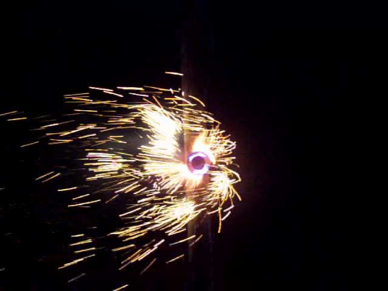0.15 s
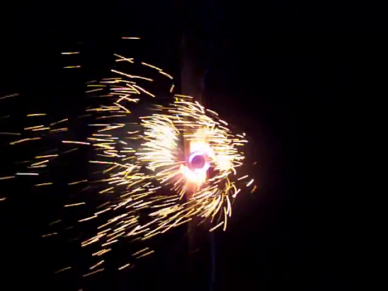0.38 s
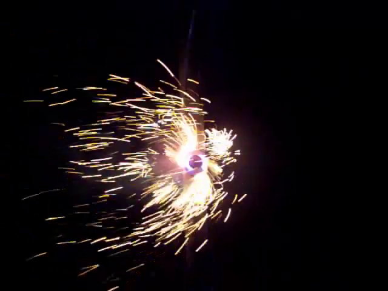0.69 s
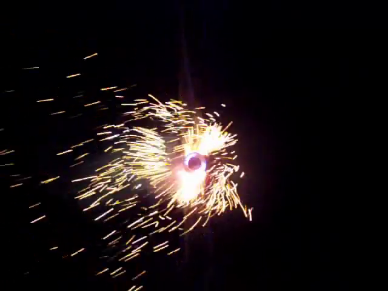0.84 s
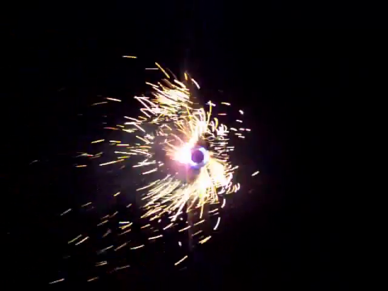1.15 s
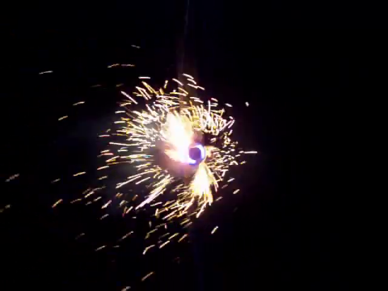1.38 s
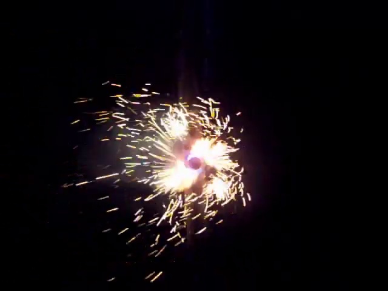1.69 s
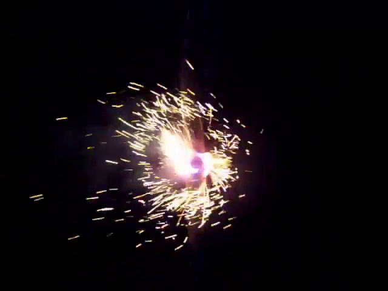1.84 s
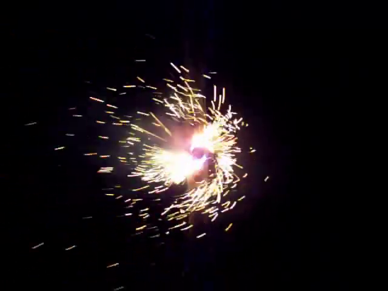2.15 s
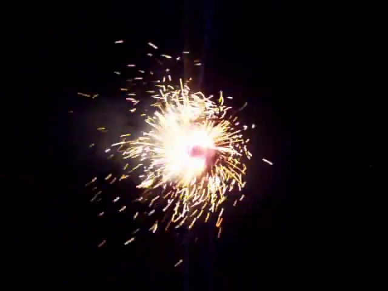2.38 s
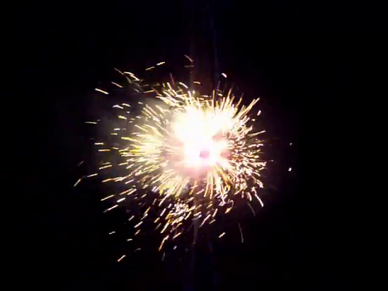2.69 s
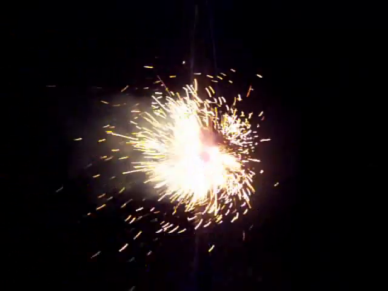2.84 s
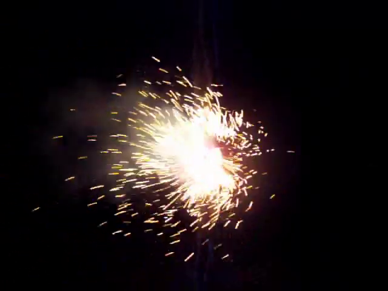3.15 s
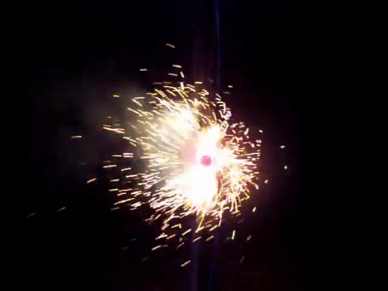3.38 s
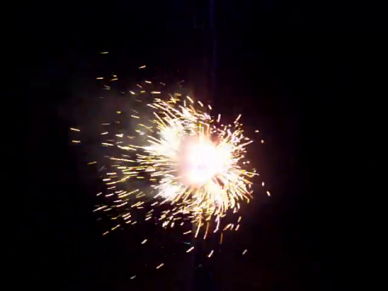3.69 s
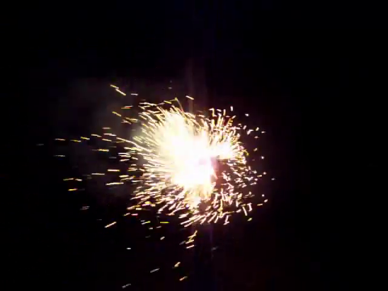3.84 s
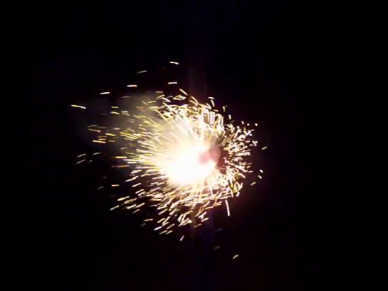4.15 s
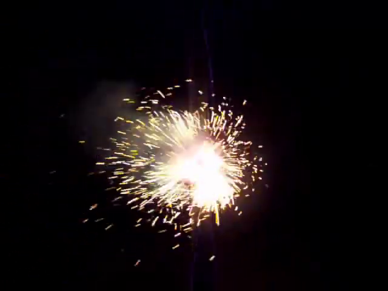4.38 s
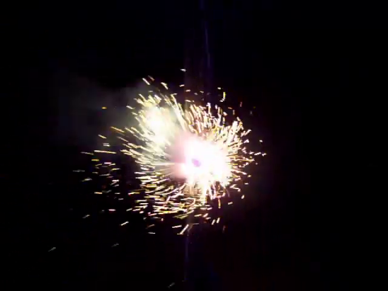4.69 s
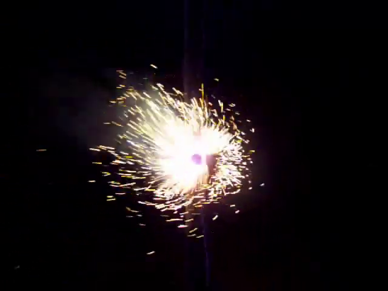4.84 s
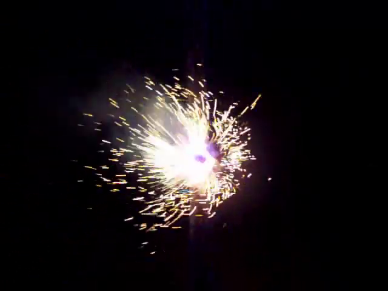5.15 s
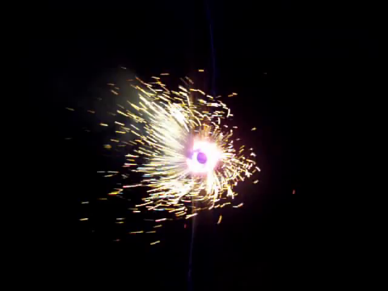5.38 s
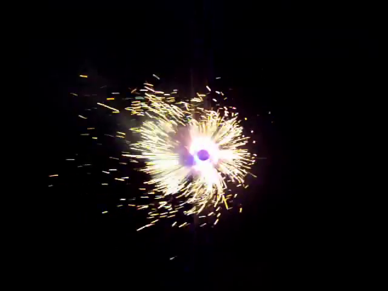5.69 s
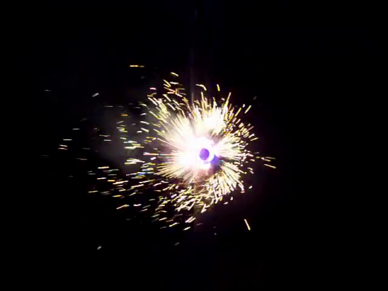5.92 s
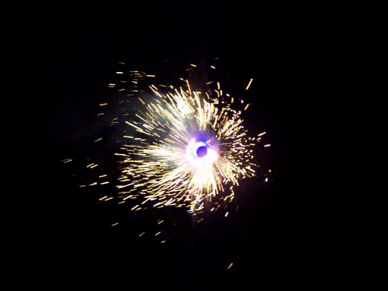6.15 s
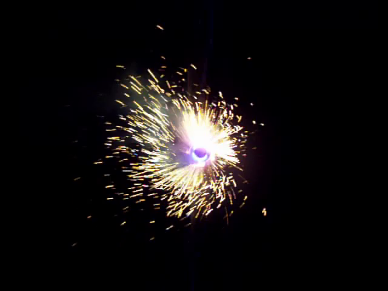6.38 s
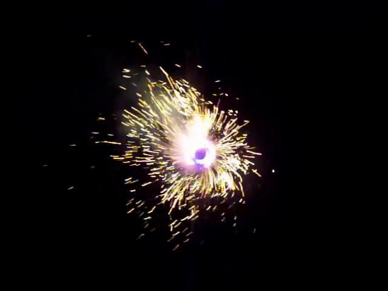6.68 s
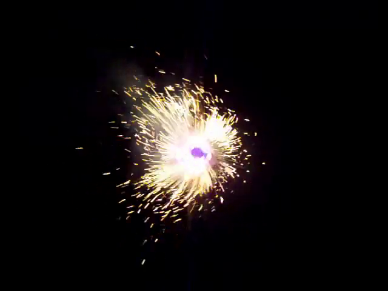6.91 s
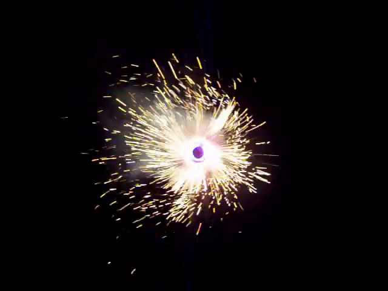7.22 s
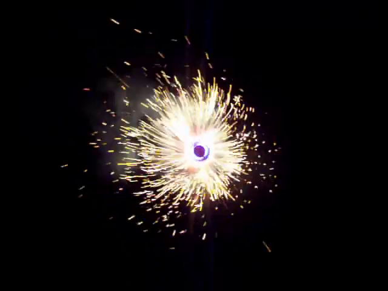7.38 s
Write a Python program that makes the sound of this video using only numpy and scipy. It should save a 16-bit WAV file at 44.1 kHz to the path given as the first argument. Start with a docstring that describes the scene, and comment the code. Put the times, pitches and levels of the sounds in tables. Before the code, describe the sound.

A spinning firework wheel hisses and roars steadily outdoors, throbbing rapidly and sputtering, with crackling sparks and a few small pops.

```python
"""Firework wheel outdoors

A firework wheel whirls on a post, some metres from a small one-port camera microphone.
Turbulence makes its two jets hiss and roar; they sputter as they burn unevenly and throb as they
swing round. Sparks crackle and a few pop. Wind pressure rumbles on the microphone port,
and the low harmonics of a far engine drone for a while and fade."""
import sys
import numpy as np
from scipy import signal
from scipy.fft import rfft, irfft
from scipy.io import wavfile
from scipy.ndimage import uniform_filter1d

SR = 44100
rng = np.random.default_rng(int(sys.argv[2]) if len(sys.argv) > 2 else 0)


def log_audio(samples):
    """Write samples as a 16-bit WAV file to the path given in sys.argv[1]."""
    # one column per channel
    frames = np.atleast_2d(samples).T
    # limit to full scale, then quantise
    limited = np.clip(frames, -1, 1)
    pcm = np.round(limited * 32767).astype(np.int16)
    wavfile.write(sys.argv[1], SR, pcm)


N = 332514

# Spectra at the microphone of the jets' hiss, sizzle and roar, the burning tube's hollow ring,
# the flame's flutter and the spark spray's thin treble: f/Hz, relative spectral density/dB
HISS_SPECTRUM = [(1200, -23.5), (1500, -15.5), (1800, -4.5), (2150, -3), (2400, 0.5), (2650, 0),
                 (2950, -3.5), (3380, -7.5), (3950, -2.5), (4400, -10), (5000, -24.5)]
SIZZLE_SPECTRUM = [(3800, -32), (4450, -8), (4700, -5), (5300, -3), (5850, -2), (6200, -5.5), (6700, -3.5),
                   (7020, -0.5), (7500, -4.5), (7850, -13.5), (8200, -36.5)]
ROAR_SPECTRUM = [(330, -25.5), (410, -16), (540, -2.5), (630, -1.5), (680, -2), (800, -0.5), (900, -0.5),
                 (975, -8), (1140, -8.5), (1300, -20), (1500, -24.5)]
RING_SPECTRUM = [(650, -23), (770, -3), (820, 1.5), (870, -6.5), (1000, -29.5)]
FLUTTER_SPECTRUM = [(76, -38.5), (130, -19.5), (167, -14.5), (290, -1.5), (410, -12), (530, -38.5),
                    (900, -120)]
SPRAY_SPECTRUM = [(7500, -15), (7900, 1), (8200, -3.5), (8450, -3), (8900, -18.5), (9150, -37)]
# Course of the burn, the roar thinning as the sizzle flares: t/s, roar/dB, hiss/dB, sizzle/dB
BURN_LEVELS = [(0, -22.5, -26.5, -26.5), (.6, -23, -29, -27.5), (1, -22, -27.5, -27), (1.3, -23, -28, -27),
               (2.15, -22.5, -27, -28), (2.4, -24, -26.5, -25.5), (2.6, -27, -26, -23),
               (2.8, -26.5, -27, -25), (3.1, -23.5, -25.5, -26), (3.6, -24.5, -25.5, -25.5),
               (4.1, -23.5, -25, -25.5), (5, -24, -26, -25.5), (5.35, -24, -27, -25.5),
               (5.7, -22.5, -25, -26.5), (6.3, -23, -26.5, -26.5), (6.9, -23, -26.5, -26.5),
               (7.3, -25.5, -26.5, -23.5), (7.54, -23.5, -26, -26.5)]
# Resonance of the tube: t/s, level relative to the roar/dB
RING_LEVEL = [(0, -7), (2.2, -5.5), (2.6, -11), (3.6, -13.5), (5.3, -9), (6.3, -14.5), (7.54, -6)]
def jets():
    """Turbulent jet noise: uneven burning modulates the bands together, and each also flickers alone."""
    hiss_throb, roar_throb, (hiss_pulse, sizzle_pulse, roar_pulse) = rotation()
    sputter, surge = walk(45), walk(17)
    hiss = gas(hiss_throb + hiss_pulse + .51 * sputter + .5 * surge + .34 * walk(30), 300, 15.6, 15)
    sizzle_flicker = .37 * surge + .61 * sputter + 1.06 * walk(80)
    sizzle = gas(.36 * hiss_throb + sizzle_pulse + sizzle_flicker, 300, 21, 16)
    roar = gas(roar_throb + roar_pulse + .4 * sputter + .93 * walk(25), 80, 22, 10.5)
    ring = gas(1.9 * roar_throb + 3.7 * roar_pulse + .75 * walk(16), 44, 24, 14)
    flutter = gas(.46 * roar_throb + .48 * surge + 1.1 * sputter + 1.35 * walk(28), 30, 27, 9.1)
    spray = gas(sizzle_pulse + .85 * sputter + .72 * surge + 2.1 * walk(70), 300, 30, 10)

    roar_db, hiss_db, sizzle_db = curves(BURN_LEVELS)
    bright_spurt, deep_spurt = spurts()
    flutter_db = -33.5 + 3 * (roar_db + 23.5)  # moves 3 dB for each dB of roar
    puffs_db = 1.46 * deep_spurt + 1.2 * walk(8)
    bands = [(hiss, HISS_SPECTRUM, hiss_db + bright_spurt),
             (sizzle, SIZZLE_SPECTRUM, sizzle_db + bright_spurt),
             (roar, ROAR_SPECTRUM, roar_db + deep_spurt),
             (ring, RING_SPECTRUM, roar_db + deep_spurt + curves(RING_LEVEL)[0]),
             (flutter, FLUTTER_SPECTRUM, flutter_db + puffs_db),
             (spray, SPRAY_SPECTRUM, sizzle_db + bright_spurt - 19.5)]
    return sum(undb(db) * unit(colour(noise, spectrum)) for noise, spectrum, db in bands)


def gas(flicker_db, sparks_per_s, max_spark_db, spark_range_db):
    """Gaussian noise of turbulence plus shot noise of sparks, modulated in amplitude together."""
    onset, polarity, size = rng.random((3, N))
    sparks = (onset < sparks_per_s / SR) * np.sign(polarity - .5)
    sparks *= undb(max_spark_db - spark_range_db * size)
    return unit(undb(flicker_db) * (rng.standard_normal(N) + sparks))


# Speed of the wheel: t/s, rotation rate/Hz
WHEEL_SPEED = [(0, 17.5), (2.46, 17.5), (2.87, 19.55), (4.6, 19.9), (5.2, 20.35), (6, 20.3), (7.54, 20.3)]
# Throb once a turn: t/s, hiss depth/dB, roar depth/dB, lead of roar over hiss/turns
TURN_THROB = [(0, 2.6, 1.7, -0.38), (.75, 2.5, 2.0, -0.26), (1.3, 2, 2.2, -.28), (1.8, 2.5, 1.3, -0.25),
              (2.4, 1.04, .5, -.42), (4.5, 1, 1, -0.55), (7, 1.06, 1.9, -0.48), (7.54, 0.4, 0.5, -0.41)]
# Pulse of the two jets, twice a turn; rows for hiss, sizzle and roar: depth/dB, lead/cycles
JET_PULSES = [(1, 0.14), (1.1, -0.3), (0.66, .15)]
def rotation():
    """Directivity: each band beams its own way from the nozzle, so peaks at its own point of the turn."""
    turns = np.cumsum(curves(WHEEL_SPEED)[0]) / SR + .45
    hiss_depth, roar_depth, roar_lead = curves(TURN_THROB)
    hiss_throb = hiss_depth * np.cos(2 * np.pi * turns)
    roar_throb = roar_depth * np.cos(2 * np.pi * (turns + roar_lead))
    pulses = [depth * np.cos(2 * np.pi * (2 * turns + lead)) for depth, lead in JET_PULSES]
    return hiss_throb, roar_throb, pulses


# Spurts (+) and falters (-) of the burn: t/s, width/s, bright bands/dB, deep bands/dB
BURN_SPURTS = [(0.116, 0.032, -5, -5), (0.34, 0.028, -1, -4), (.39, .05, 2, -0.5), (0.454, .05, -2.5, 2),
               (0.616, .04, 3.5, 2), (0.69, .06, -0.5, -3), (0.922, .08, 0.5, 1), (1.06, 0.055, -1, -5.5),
               (1.122, .06, 1.5, 4), (1.174, 0.083, -3.5, -2.5), (1.513, 0.023, 0, 3.5),
               (1.596, 0.089, 2, -2.5), (1.648, 0.045, -1.5, -1.5), (1.9, 0.029, -2, -2.5),
               (3.38, 0.027, -3.5, 0), (3.425, .05, 1.5, 1.5), (4.36, 0.05, -3.5, -1.5),
               (6.22, 0.14, -0.5, 1), (6.353, 0.027, -2, -3), (6.403, .04, 0.5, 3.5),
               (6.449, 0.023, -5.5, -1.5), (6.502, 0.023, -5.5, -4), (6.655, .04, -2.5, -1.5),
               (7.197, 0.035, 0, -4), (7.43, 0.071, 0, -3)]
def spurts():
    """Unsteady combustion: each spurt or falter is a Gaussian rise or dip in level."""
    t = np.arange(N) / SR
    return sum(np.exp(-(2 * (t - centre) / width) ** 2) * np.array([[bright_db], [deep_db]])
               for centre, width, bright_db, deep_db in BURN_SPURTS)


# Loud sparks: t/s, level/dB, share of the roar's spectrum (0-1)
LOUD_SPARKS = [(0.141, -24, 0.4), (0.396, -9, 0.76), (0.597, -5.5, 0.45), (0.877, -9, 0.4),
               (1.355, -14, 0.8), (1.468, -11, 0.3), (1.992, -7, 0.56), (2.097, -9, 0.76),
               (2.297, -11, 0.7), (4.333, -7.5, 0.6), (4.514, -13, 0.4), (6.518, -10, 1), (6.687, -8, 0.95),
               (6.919, -11, 0.9)]
def pops(delay_s=.0012):
    """Impulse excitation: a bursting spark is a short pressure pulse with the spectra of the jets."""
    out = np.zeros(N)
    crack, thud = response(HISS_SPECTRUM)[:1024], response(ROAR_SPECTRUM)[:1024]
    crack, thud = crack / np.abs(crack).max(), thud / np.abs(thud).max()
    for t, db, share in LOUD_SPARKS:
        start = int((t + delay_s) * SR)
        pulse = ((1 - share) * crack + share * thud)[:N - start]
        out[start:start + len(pulse)] += undb(db) * pulse
    return out


# Wind pressure at the port: f/Hz, relative spectral density/dB
WIND_SPECTRUM = [(12, -35.5), (20, -7), (86, -0.5), (150, -6.5), (200, -29.5), (330, -120)]
# Gusts: t/s, level of the rumble below 76 Hz/dB
GUST_LEVEL = [(0, -36), (.5, -47), (1.4, -43.5), (1.75, -55), (2.75, -57), (3.2, -56), (4.4, -56),
              (5.1, -46), (5.4, -52), (6.15, -51), (6.9, -49.5), (7.3, -60.5), (7.54, -55)]
def wind():
    """Turbulent pressure fluctuations: gusts buffet the microphone port at low frequencies."""
    buffet = colour(rng.standard_normal(N), WIND_SPECTRUM)
    rumble = signal.sosfilt(signal.butter(4, 76, fs=SR, output="sos"), buffet)
    buffet /= np.sqrt(np.mean(rumble ** 2))
    return undb(curves(GUST_LEVEL)[0] + 2 * walk(12) + walk(5)) * buffet


# Audible engine harmonics: order, relative level/dB
ENGINE_ORDERS = [(6, 0), (7, -5), (8, -18)]
# Engine cycle rate, sinking as the vehicle draws away: t/s, f/Hz
ENGINE_CYCLE = [(0, 13.85), (3.1, 13.8), (3.8, 13.5), (4.6, 13.1), (7.54, 13)]
# Swell and fade of the drone: t/s, level/dB
ENGINE_LEVEL = [(1.35, -71), (1.5, -43), (2.2, -43), (3.1, -49), (3.7, -53), (3.95, -53), (4.6, -50.5),
                (5.2, -70)]
def engine():
    """A periodic source radiates harmonics of its cycle rate; only a few low orders carry this far."""
    cycle_hz, level_db = curves(ENGINE_CYCLE)[0], curves(ENGINE_LEVEL)[0]
    phase = 2 * np.pi * np.cumsum(cycle_hz) / SR
    drone = sum(undb(db + 1.6 * walk(3.4)) * np.sin(order * phase) for order, db in ENGINE_ORDERS)
    return undb(level_db) * np.sqrt(2) * drone


def undb(db):
    """Amplitude ratio of a level in decibels."""
    return 10 ** (np.asarray(db) / 20)


def unit(x):
    """Normalisation to rms 1."""
    return x / np.sqrt(np.mean(x ** 2))


def curves(table):
    """Linear interpolation of each column against time, one value per sample."""
    times, *columns = np.transpose(table)
    return [np.interp(np.arange(N) / SR, times, column) for column in columns]


def walk(rate_hz):
    """Low-pass random modulation: values held for 1 / rate_hz, smoothed twice, at rms 1."""
    hold = int(SR / rate_hz)
    steps = np.repeat(rng.standard_normal(N // hold + 1), hold)
    return unit(uniform_filter1d(uniform_filter1d(steps, hold), hold)[:N])


def response(spectrum, skirt_db=30, size=8192):
    """Minimum-phase impulse response of energy 1 for a spectrum of (f/Hz, level/dB) points."""
    hz, db = np.transpose(spectrum)
    hz = np.r_[hz[0] / 2, hz, hz[-1] * 2]
    db = np.r_[db[0] - skirt_db, db, db[-1] - skirt_db]
    grid_hz = np.maximum(np.arange(size // 2 + 1), 1) * SR / size
    gain = undb(np.interp(np.log(grid_hz), np.log(hz), db))
    cepstrum = irfft(np.log(gain))
    cepstrum[1:size // 2] *= 2  # folding onto positive time makes the response causal
    cepstrum[size // 2 + 1:] = 0
    impulse = irfft(np.exp(rfft(cepstrum)))
    return impulse / np.sqrt(np.sum(impulse ** 2))


def colour(x, spectrum):
    """Convolution with an impulse response imposes its spectrum on a sound."""
    return signal.fftconvolve(x, response(spectrum))[:N]


def scene():
    """Superposition: the sources add at one microphone, which feeds both channels."""
    return np.tile(jets() + pops() + wind() + engine(), (2, 1))


def record(dry, cutoff_hz=9130):
    """Band limiting: the camera's steep low-pass filter removes the top of the treble."""
    return signal.sosfilt(signal.ellip(14, .5, 70, cutoff_hz, fs=SR, output="sos"), dry)


dry = scene()
out = record(dry)
log_audio(out)
```